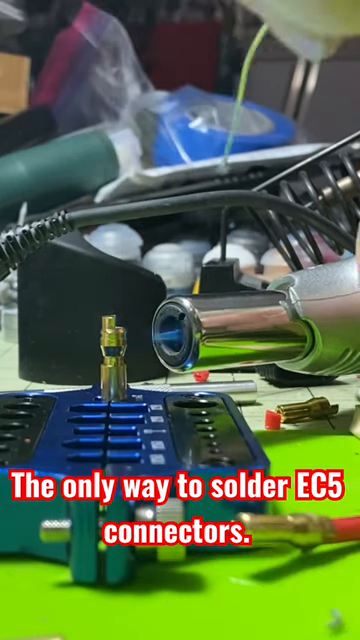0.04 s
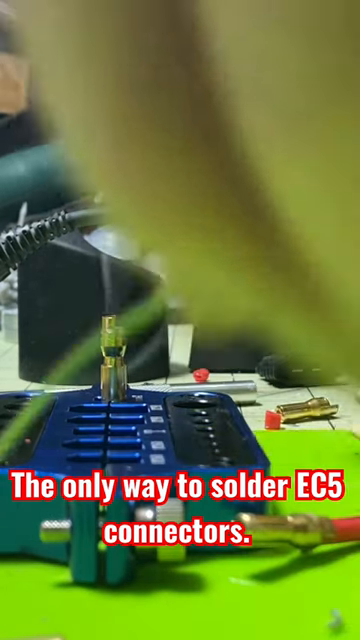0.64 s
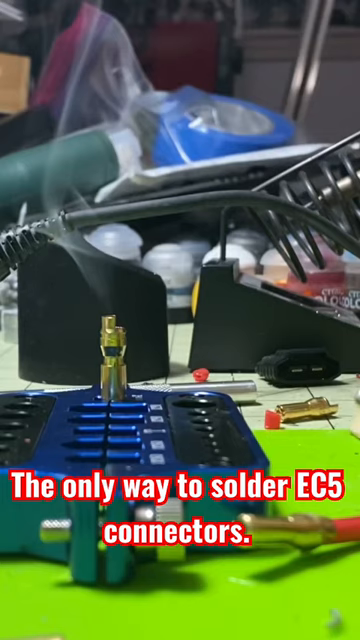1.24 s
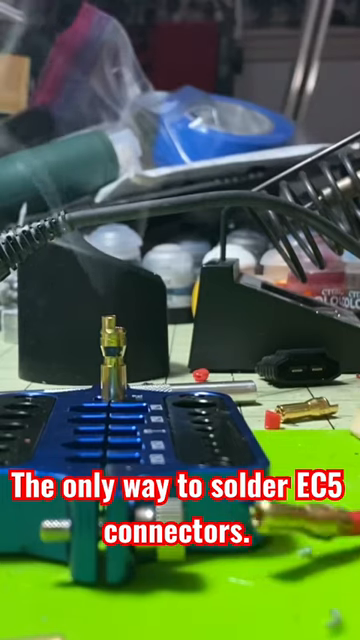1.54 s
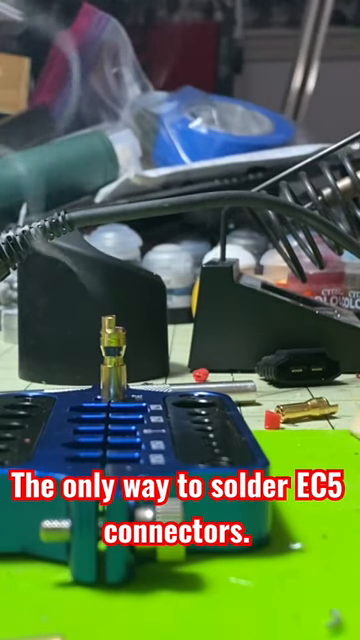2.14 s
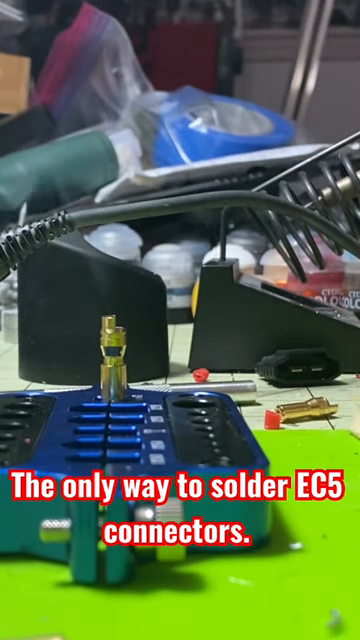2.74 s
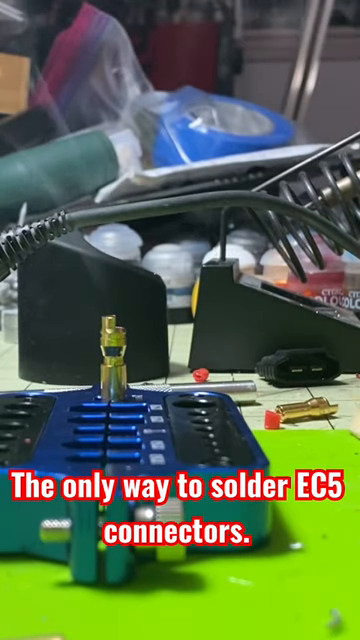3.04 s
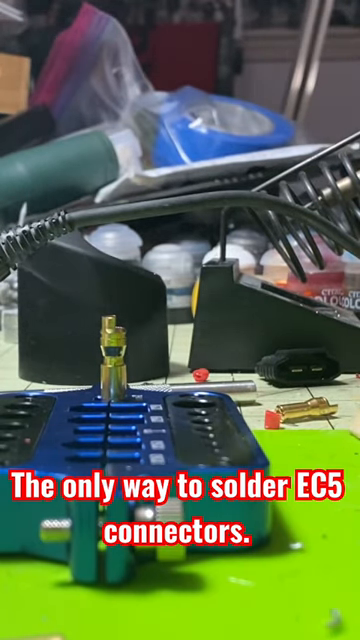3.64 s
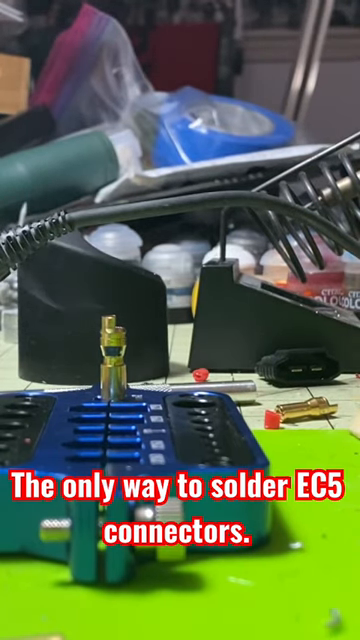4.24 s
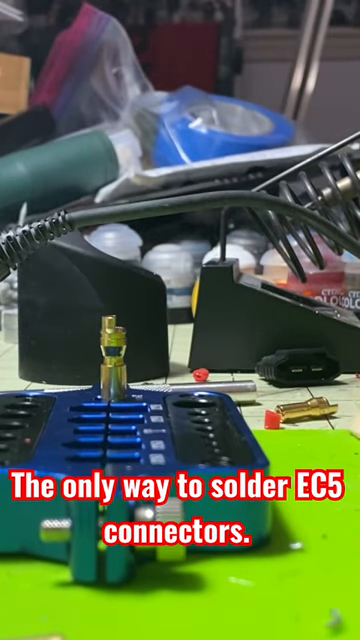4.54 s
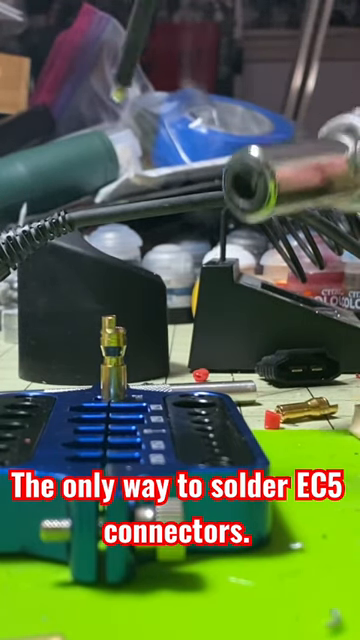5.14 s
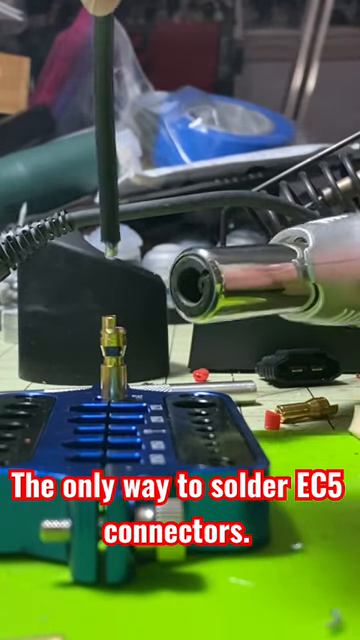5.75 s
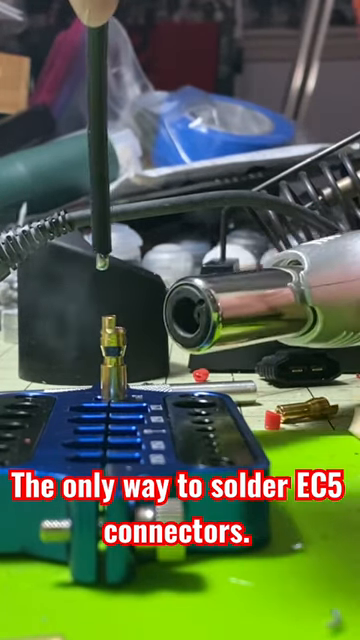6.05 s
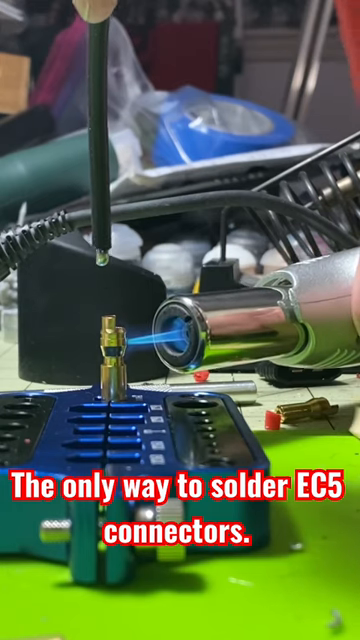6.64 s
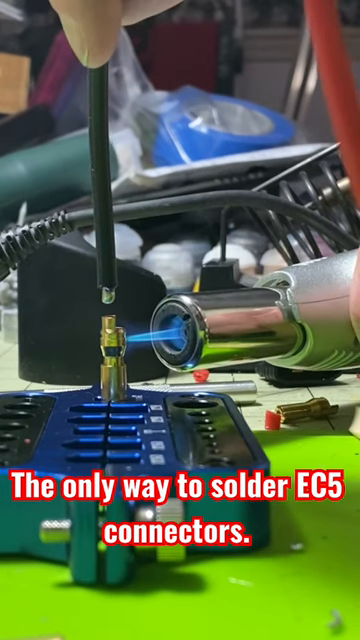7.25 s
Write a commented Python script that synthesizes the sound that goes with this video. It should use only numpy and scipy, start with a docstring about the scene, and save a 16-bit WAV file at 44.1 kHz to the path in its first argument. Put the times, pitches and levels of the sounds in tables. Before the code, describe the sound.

Things are handled on a workbench in a small room, heard from close by: sharp plastic clicks, dull knocks, light rubbing and a brief metal clink. A quiet fan hum comes in as the clicks thin out. Then a gas torch valve opens with a thin hiss. A loud igniter snap and a small puff light the jet flame, which keeps burning with a quiet, even rush.

```python
"""First, hands rub and bump a soldering bench in a small workshop, close to the microphone.
Plastic parts click, a brass connector clinks on its cable, and a small fan hums on the bench.
Near the end, the valve of a butane torch opens and gas hisses thinly through the nozzle.
The piezo igniter snaps, the gas catches with a puff, and the jet flame burns with a steady roar."""
import sys
import numpy as np
from scipy import signal
from scipy.fft import rfft, irfft, next_fast_len
from scipy.io import wavfile

SR = 44100
rng = np.random.default_rng(int(sys.argv[2]) if len(sys.argv) > 2 else 0)


def store_pcm(level_fs):
    """Save levels as 16-bit WAV."""
    pcm = np.round(np.clip(level_fs, -1, 1) * 32767).astype(np.int16)
    wavfile.write(sys.argv[1], SR, np.atleast_2d(pcm).T)


N = 325458

TIME = np.arange(N) / SR
AGE = np.arange(SR // 2) / SR   # seconds since a hit
SIZE = next_fast_len(N + SR // 2)
FREQ = np.maximum(np.arange(SIZE // 2 + 1) * SR / SIZE, 1)
GAS_ON_S, IGNITE_S = 5.835, 6.4575


# the roar of the flame: (frequency [Hz], level [dB])
FLAME_ROAR = [(40, -21), (100, -9.5), (250, 1.5), (700, 0.5), (1200, -2.5), (2200, -12), (3600, -12.5),
              (4600, -9.5), (5600, -17), (9000, -45), (12000, -34)]
# peaks and dips in the flame's roar: (frequency [Hz], width [Hz], gain [dB])
ROAR_PEAKS = [(1449, 120, -20), (1613, 48, 9), (1840, 71, 7), (2130, 100, -5), (2307, 94, 7),
              (2350, 270, 1), (3020, 380, 8), (3590, 60, 10), (4440, 220, -11), (5500, 690, -22)]

def jet_flame():
    """The jet flame makes a broad roar whose low part, below about 800 Hz, flickers."""
    roar = noise(from_db(over_hz(FLAME_ROAR)) * colour(ROAR_PEAKS))
    lows = filtered(roar, keep_below(800))
    flickering = roar - lows + lows * flutter(42, depth_db=1.5)
    return from_db(-48) * ramp(IGNITE_S, length_s=0.018) * flickering


# bands of the gas hiss, cold and with the flame lit; nozzle tones below, thin airy bands on top:
# (frequency [Hz], width [Hz], level [dB])
COLD_HISS = [(4820, 290, 2.5), (5850, 200, -8), (6500, 520, -14.5), (7320, 310, -11), (4020, 1950, -19),
             (10170, 370, -20), (10980, 460, -13), (14400, 460, -18), (15300, 700, -25.5)]
HOT_HISS = [(4940, 350, -1.5), (7500, 640, -4), (10150, 320, -22), (10940, 530, -19.5), (14300, 290, -17.5)]

def gas_hiss():
    """Gas hisses through the nozzle tube; the flame heats the tube, which retunes the hiss."""
    valve, heat = ramp(GAS_ON_S, length_s=0.08), ramp(IGNITE_S, length_s=0.036)
    hiss = np.sqrt(1 - heat) * banded_noise(COLD_HISS) + np.sqrt(heat) * banded_noise(HOT_HISS)
    return from_db(-56.5) * valve * hiss


def banded_noise(bands):
    """A hiss gathered into a few bands."""
    return noise(sum(from_db(db) * np.abs(resonance(hz, width)) ** 2 for hz, width, db in bands))


# the igniter's hammer and its two bounces: (time [s], level [dB])
HAMMER_TAPS = [(6.4588, -0.5), (6.4606, -12), (6.477, -21)]
# ringing tones of the torch body: (pitch [Hz], level [dB], fade time [s])
TORCH_TONES = [(1263.5, -11, 0.022), (1907, -4.5, 0.029), (2640, -13.5, 0.0076), (3667, -9, 0.018),
               (4002, -7, 0.018), (4875, 2.5, 0.018), (6070, -11, 0.011), (6918, 0, 0.0225),
               (12000, -10.5, 0.01), (14300, -13, 0.012), (14910, -3, 0.017)]

def igniter():
    """A sprung hammer hits the crystal, the hand damps the ringing, and the gas catches with a puff."""
    out = struck(HAMMER_TAPS, TORCH_TONES, crack_db=-3, crack_fade_s=0.036)
    puff = thump(hz=109, octaves=1.38, bench_share=0)
    add(out, IGNITE_S, -14.5, puff)
    return out


# plastic clicks; larger parts reach lower and harder contacts reach higher:
# (time [s], level [dB], low edge [Hz], high edge [Hz], fade time [s])
PLASTIC_CLICKS = [(0.338, -49, 1940, 8500, 0.016), (0.52, -46, 1260, 2840, 0.022),
                  (0.702, -32, 1550, 14500, 0.035), (0.713, -30, 1410, 12100, 0.074),
                  (0.818, -43, 2010, 12000, 0.062), (0.8967, -8, 1457, 14800, 0.021),
                  (0.916, -19, 1490, 12900, 0.035), (0.94, -34, 1830, 6000, 0.016),
                  (0.948, -37, 2450, 11800, 0.012), (.987, -36, 2540, 4240, 0.006),
                  (1.043, -20, 1336, 10550, 0.019), (1.331, -56, 5130, 13000, 0.023),
                  (1.444, -57.5, 1748, 4220, 0.014), (1.938, -37, 1600, 3056, 0.019),
                  (2.017, -33.5, 1190, 3280, 0.048), (2.029, -42, 980, 3630, 0.026),
                  (2.078, -39, 1110, 3080, 0.033), (2.105, -53, 700, 1670, 0.018),
                  (2.117, -39, 884, 1950, 0.02), (3.273, -19, 1610, 14200, 0.015),
                  (3.28, -31.5, 1002, 5800, 0.021), (3.337, -43, 1980, 14000, 0.034),
                  (3.487, -40.5, 1680, 13000, 0.027), (3.555, -46.5, 3176, 12080, 0.01),
                  (4.193, -34.5, 1784, 16960, 0.033), (4.228, -37.5, 1750, 5000, 0.0084),
                  (4.311, -43.5, 1800, 17500, 0.06), (4.64, -53.5, 2420, 9860, 0.22),
                  (4.707, -20, 2480, 8890, 0.017), (4.713, -31.5, 3000, 9070, 0.0095),
                  (4.932, -56.5, 1200, 4460, 0.082), (5.144, -40, 1140, 2080, 0.01),
                  (5.637, -50.5, 1670, 10000, 0.027), (5.751, -58.5, 2220, 4260, 0.012),
                  (5.876, -59, 1720, 3070, 0.013), (6.133, -47.5, 1700, 3980, 0.019)]
# peaks and dips of the plastic shell: (frequency [Hz], width [Hz], gain [dB])
PLASTIC_SHELL = [(2460, 300, 3.5), (3900, 210, 1.5), (5600, 700, -2.5), (7160, 500, 2), (9700, 900, 1.5),
                 (10900, 310, 4), (15000, 600, -4.5)]

def plastic_clicks(tone_count=5, ring_db=-20.5, ring_fade_s=0.026):
    """Plastic parts snap together; each snap rings a few tones, and the shell colours them all."""
    out = np.zeros((2, N))
    for s, db, low_hz, high_hz, fade_s in PLASTIC_CLICKS:
        span = high_hz / low_hz
        snap = band(crack(fade_s), np.sqrt(low_hz * high_hz), np.log2(span))
        places = (np.arange(tone_count) + rng.random(tone_count)) / tone_count
        ring = ringing([(hz, ring_db, ring_fade_s) for hz in low_hz * span ** places])
        add(out, s, db, snap / np.abs(snap).max() + ring)
    return filtered(out, colour(PLASTIC_SHELL))


# knocks on the bench: (time [s], level [dB], pitch [Hz], width [octaves], left over right [dB])
BENCH_BUMPS = [(.519, -27.5, 154.3, 1.77, 0), (0.712, -27.5, 225, 2.34, 2.5),
               (0.8967, -8.5, 395, 2.03, 3.5), (.911, -14.5, 140, 2.44, 2),
               (1.023, -28.5, 164.9, 1.85, 0.5), (1.042, -27, 171, 4.1, 5), (1.155, -33, 330.7, 1.02, -1),
               (1.228, -28.5, 84.85, 1.3, -4.5), (1.287, -30.5, 171, 1.34, 3), (1.445, -47, 403, 1.3, 0),
               (1.58, -48, 451, 1.24, 3), (1.785, -41.5, 190, 1.4, 4.5), (1.856, -41, 374, 0.78, -1),
               (2.019, -28, 295.2, 1.9, -3), (2.080, -27.5, 216, 1.8, 0), (2.105, -28.5, 234.5, 1.8, 0),
               (2.127, -19, 85, 1.42, -6.5), (4.2126, -23, 384, 2.14, -11.5), (4.224, -29, 397, 1.8, -8.5),
               (4.314, -42.5, 418, 1.77, -4), (4.455, -51.5, 375, 0.75, 3.5), (4.555, -56.5, 593, 1.26, 0),
               (4.916, -45, 423, 1.97, -2), (5.418, -36.5, 309, 0.65, 2)]

def bench_bumps():
    """Hands and tools knock on the bench; the deepest bumps are mostly a push of air."""
    out = np.zeros((2, N))
    for s, db, hz, octaves, pan_db in BENCH_BUMPS:
        bench_share = 0.38 / (1 + (57 / hz) ** 2)
        sides = from_db([[pan_db / 2], [-pan_db / 2]])
        add(out, s, db, thump(hz, octaves, bench_share) * sides)
    return out


# ringing tones of the bench top: (pitch [Hz], level [dB], fade time [s])
BENCH_TONES = [(62, -10, 0.45), (105.3, 4, 0.17), (200, -4, 0.27), (227.5, -3.5, 0.27), (359, -7.5, 0.023),
               (473, -3, 0.08), (596, -3, 0.15), (743.4, -10, 0.013)]

def thump(hz, octaves, bench_share, settle_s=0.016):
    """A soft push of air; what is set down rocks twice, the bench rings and things on it shudder."""
    first, second = (signal.unit_impulse(len(AGE), int(SR * s)) for s in settle_s * rng.random(2))
    ring = 0.01 * ringing(BENCH_TONES)
    shudder = 0.098 * crack(fade_s=0.08)
    push = signal.unit_impulse(len(AGE))
    return band(push + bench_share * (first - second + ring + shudder), hz, octaves)


# taps of the connector: (time [s], level [dB])
CONNECTOR_TAPS = [(1.7356, -23.5), (1.810, -46)]
# its ringing tones: (pitch [Hz], level [dB], fade time [s])
CONNECTOR_TONES = [(2600, -8, 0.045), (3299, -6.5, 0.013), (4280, -3, 0.034), (4830, -6, 0.061),
                   (5320, -8, 0.027), (7140, -9, 0.024), (11410, -14, 0.023)]

def brass_connector():
    """The connector on its cable taps the vice and clinks."""
    return struck(CONNECTOR_TAPS, CONNECTOR_TONES, crack_db=1, crack_fade_s=0.012, hz=6550, octaves=2)


# nudges of the connector: (time [s], level [dB])
NUDGE_TAPS = [(.898, -33), (2.018, -38.5), (2.081, -42), (2.129, -30.5)]
# the tones they ring: (pitch [Hz], level [dB], fade time [s])
NUDGE_TONES = [(2290, -9, .15), (3597, 1.5, 0.09), (4990, -5, .06), (7105, -13, .04), (9220, -1, 0.038),
               (11650, -3, .025), (15510, -20, .03)]

def connector_nudges():
    """The connector on its cable is nudged and rings briefly, with a second kind of metal clink."""
    return struck(NUDGE_TAPS, NUDGE_TONES, crack_db=-7.5, crack_fade_s=0.0089)


# nudges of the stand: (time [s], level [dB])
WIRE_TAPS = [(.9, -44.5), (4.224, -45)]
# its ringing tones: (pitch [Hz], level [dB], fade time [s])
WIRE_TONES = [(610, 1.5, 0.7), (1760, -14.5, 0.35), (2600, -8, 0.33), (2934, -11.5, 0.35)]

def wire_stand():
    """The wire stand of the soldering iron is nudged and rings on softly."""
    return struck(WIRE_TAPS, WIRE_TONES, crack_db=-7, crack_fade_s=0.29)


# fingers and cable sliding over the bench:
# (middle time [s], length [s], dull drag [dB], bright rustle [dB], rustle pitch [Hz])
BENCH_RUBS = [(0.02, 0.22, -70.5, -56.5, 1620), (0.167, 0.36, -76.5, -76, 3200),
              (0.376, 0.11, -80, -70.5, 3160), (0.491, 0.058, -70.5, -66.5, 3570),
              (0.59, 0.19, -55, -71.5, 3020), (0.825, 0.36, -68, -69, 3020), (0.906, 0.079, -52, -52, 3300),
              (1.13, 0.11, -53, -59, 2600), (1.385, 0.42, -63.5, -69.5, 2720),
              (1.704, 0.37, -58, -83, 2620), (1.904, 0.16, -53.5, -61.5, 2056),
              (2.055, 0.16, -49.5, -68, 1900), (2.66, 0.36, -86, -81.5, 3930),
              (2.958, 0.18, -80.5, -79, 2313), (4.347, 0.19, -60, -76.5, 1500),
              (4.551, 0.42, -67, -83, 978), (5.007, 0.082, -78, -71, 1900), (5.678, 0.06, -63, -71, 1958),
              (6.316, 0.54, -75, -79, 1752)]

def rubbing(tremble_hz=88):
    """Each rub swells and fades, sticking and slipping; bumps and dragging make the bench tremble."""
    friction, slips = noise(1) * flutter(90, depth_db=3), slipping()
    drag, rustle, tremble = np.zeros(N), np.zeros((2, N)), np.zeros((1, N))
    for s, length, drag_db, rustle_db, rustle_hz in BENCH_RUBS:
        now = np.abs(TIME - s) < length / 2
        swell = np.cos(np.pi * (TIME[now] - s) / length)
        drag[now] += from_db(drag_db) * swell
        bright = rms_one(band(slips[:, now], rustle_hz, octaves=1.1))
        rustle[:, now] += from_db(rustle_db) * swell * bright
    shake = (1 - dying(0.02)) * dying(0.4)   # builds fast, fades slowly
    for s, db, hz, _, _ in BENCH_BUMPS:
        add(tremble, s, db - 17 - 20 * np.log10(hz / tremble_hz), shake)   # deeper bumps shake more
    scrape = drag * flutter(7.6, depth_db=1.5) * rms_one(band(friction, hz=434, octaves=0.95))
    rumble = rms_one(band(friction.mean(axis=0), tremble_hz, octaves=1.8))
    return rustle + scrape + (tremble + from_db(4) * drag) * rumble


# peaks and dips of the rubbed parts: (frequency [Hz], width [Hz], gain [dB])
RUBBED_PARTS = [(2760, 300, 3.5), (3180, 600, -7.5), (4320, 590, 3.5), (6300, 840, 0)]

def slipping(slips_per_s=520, spread_db=3):
    """Tiny slips crackle over an even hiss, and both surge with the pressure of the rub."""
    sizes = from_db(spread_db * np.minimum(rng.exponential(1, N), 4)) * rng.choice([-1, 1], N)
    slips = sizes * (rng.random(N) < slips_per_s / SR)
    return filtered(rms_one(slips) + noise(1), colour(RUBBED_PARTS)) * flutter(6.7, depth_db=4.5)


def grip_squeak(middle_s=6.035, length_s=0.065, hz=1800):
    """A faint squeak as the torch is gripped: one tone that swells and fades."""
    swell = np.cos(np.pi * np.clip((TIME - middle_s) / length_s, -.5, .5))
    return from_db(-67.5) * swell * np.sin(2 * np.pi * hz * TIME)


# how loud the fan is: (time [s], level [dB])
FAN_LEVEL = [(0, -77.5), (1.7, -65), (2.0, -54), (4.32, -53), (4.53, -79), (4.74, -51.5), (4.93, -62),
             (7.38, -60)]
# its rush of air: (frequency [Hz], level [dB])
FAN_RUSH = [(400, -8), (800, -11), (1150, -5), (1600, -21.5), (4000, -24.5)]

def bench_fan(hum_hz=218.2, sag_hz=6.8, sag_at_s=4.6, sag_spread_s=0.22):
    """A small fan hums over a faint rush of air; its pitch is steady but for one brief sag."""
    level = from_db(in_time(FAN_LEVEL))
    hz = hum_hz - sag_hz * np.exp(-((TIME - sag_at_s) / sag_spread_s) ** 2)
    phase = 2 * np.pi * np.cumsum(hz) / SR
    octave = from_db(-21) * level / level.max() * np.sin(2 * phase)   # grows with the hum
    hum = np.sqrt(2) * (np.sin(phase) + octave)
    air = from_db(-28) * noise(from_db(over_hz(FAN_RUSH)) * (FREQ < 5000))
    return level * (hum + air)


# how much of the hits feeds the echo; close work is drier: (time [s], level [dB])
ECHO_AMOUNT = [(.7, -1.5), (.9, -6.5), (1.05, -1.5), (1.75, -3), (2.1, -1), (3.3, 0.5), (4.7, -0.5),
               (6.45, -7.5)]
# the tone of the echo: (frequency [Hz], level [dB])
ECHO_TONE = [(60, -14.5), (400, -5.5), (1500, -3.5), (2600, -4), (5000, -6), (8000, -16), (16000, -21.5)]

def workshop_echo(hits, fade_s=0.14, treble_fade_s=0.32):
    """A small cluttered room blurs the hits into echoes, different on each side and longer in treble."""
    sent = hits.mean(axis=0) * from_db(in_time(ECHO_AMOUNT))
    echoes = rng.standard_normal((2, len(AGE))) * (1 - dying(0.023))
    tail, treble_tail = echoes * dying(fade_s), echoes * dying(treble_fade_s)
    low = keep_below(6500)
    response = low * rfft(tail, SIZE) + (1 - low) * rfft(treble_tail, SIZE)
    return filtered(sent, response * from_db(over_hz(ECHO_TONE)) / np.linalg.norm(tail[0]))


# the quiet of the workshop: (frequency [Hz], level [dB])
QUIET_ROOM = [(25, -20), (50, 0), (90, 2), (160, -2), (300, -7), (600, -24), (1200, -24), (2000, -32.5),
              (4500, -35), (8000, -40.5), (11500, -34.5), (13200, -44), (15500, -35)]

def workshop_quiet():
    """A faint, steady rumble lies under everything."""
    return from_db(-65.5) * noise(from_db(over_hz(QUIET_ROOM)))


# how alike left and right are: (frequency [Hz], likeness [0 to 1])
STEREO_LIKENESS = [(60, 0.78), (290, 0.77), (640, 0.094), (1400, 0.035), (3100, 0.56), (7000, 0.081),
                   (15000, 0.73)]

def noise(gain):
    """Stereo noise shaped by a gain at each frequency, partly alike on both sides; rms 1."""
    mid, side = rng.standard_normal((2, N))
    alike = np.clip(over_hz(STEREO_LIKENESS), 0, 1)
    shared = filtered(mid, gain * np.sqrt(1 + alike))
    opposed = filtered(side, gain * np.sqrt(1 - alike)) * [[1], [-1]]
    return rms_one(shared + opposed)


def struck(taps, tones, crack_db, crack_fade_s, hz=5000, octaves=4.6):
    """Each tap on metal gives a crack around hz and a ring; softer taps stir the high tones less."""
    out, hardest = np.zeros((2, N)), max(db for _, db in taps)
    for s, db in taps:
        db_per_octave = 0.35 * (db - hardest)
        stirred = [(pitch, level + db_per_octave * np.log2(pitch / tones[0][0]), fade_s)
                   for pitch, level, fade_s in tones]
        add(out, s, db, ringing(stirred) + from_db(crack_db) * band(crack(crack_fade_s), hz, octaves))
    return out


def ringing(tones, detune=0.0041):
    """Fading tones, each beating with a weaker twin; strengths vary by blow and by side."""
    strengths = from_db(1.5 * rng.standard_normal((len(tones), 2, 1)))
    twins = 1 + detune * rng.standard_normal(len(tones))
    out = np.zeros((2, len(AGE)))
    for k, (hz, db, fade_s) in enumerate(tones):
        phase = 2 * np.pi * hz * AGE
        pair = (np.sin(phase) + .5 * np.sin(twins[k] * phase)) / 1.5
        out += (-1) ** k * strengths[k] * from_db(db) * pair * dying(fade_s)
    return out


def crack(fade_s):
    """The noisy, fading vibration of a hard contact, a little different on each side."""
    mid, side = rng.standard_normal((2, len(AGE)))
    return (mid + .35 * side * [[1], [-1]]) * dying(fade_s) * (1 - dying(.005))


def add(out, s, db, sound):
    """Mix a sound in at a time and a peak level."""
    at = round(s * SR)
    out[:, at:at + len(AGE)] += (from_db(db) * sound / np.abs(sound).max())[..., :N - at]


def dying(fade_s):
    """A level that falls 60 dB in the fade time."""
    return from_db(-60 * AGE / fade_s)


def ramp(start_s, length_s):
    """A straight rise from 0 to 1."""
    return np.clip((TIME - start_s) / length_s, 0, 1)


def flutter(rate_hz, depth_db):
    """A randomly wavering gain."""
    return from_db(depth_db * rms_one(filtered(rng.standard_normal(N), keep_below(rate_hz))))


def from_db(db):
    """Decibels to gain."""
    return 10 ** (np.asarray(db) / 20)


def rms_one(x):
    """Scale to unit rms."""
    return x / np.sqrt(np.mean(x ** 2) + 1e-20)


def in_time(points):
    """Join (time [s], value) points with straight lines."""
    return np.interp(TIME, *np.transpose(points))


def over_hz(points):
    """Join (frequency [Hz], value) points, with octaves evenly spaced."""
    hz, value = np.transpose(points)
    return np.interp(np.log(FREQ), np.log(hz), value)


def filtered(x, response):
    """Pass a sound through a filter curve."""
    return irfft(rfft(x, SIZE) * response, SIZE)[..., :N]


def band(x, hz, octaves):
    """Keep a band of frequencies around hz."""
    half = 2 ** (octaves / 2)
    edges = [hz / half, min(hz * half, .45 * SR)]
    return signal.sosfilt(signal.butter(2, edges, "band", fs=SR, output="sos"), x)


def keep_below(hz):
    """A filter curve that keeps what lies below hz."""
    return 1 / (1 + (FREQ / hz) ** 4)


def resonance(hz, width):
    """A filter curve with one peak of height 1."""
    return 1 / (1 + 1j * (FREQ ** 2 - hz ** 2) / (FREQ * width))


def colour(peaks):
    """A filter curve of peaks and dips: (frequency [Hz], width [Hz], gain [dB])."""
    return np.prod([1 + (from_db(db) - 1) * resonance(hz, width) for hz, width, db in peaks], axis=0)


# how much louder the bench is on the left: (frequency [Hz], left over right [dB])
SIDE_BALANCE = [(60, 3), (380, 1), (700, 3), (1290, 2), (2400, 5), (4400, 6.5), (8100, 1.5), (15000, 0.5)]

def scene():
    """Sounds from the bench arrive a little earlier and louder on the left; the room surrounds them."""
    metal = brass_connector() + connector_nudges() + wire_stand()
    hits = metal + plastic_clicks() + bench_bumps() + igniter()
    # the deepest bass is cut from the hits
    hits = signal.sosfilt(signal.butter(2, 48, "high", fs=SR, output="sos"), hits)
    near = hits + rubbing() + grip_squeak() + gas_hiss() + jet_flame() + bench_fan()
    balance = from_db(over_hz(SIDE_BALANCE) * [[.5], [-.5]])
    lag = np.exp(-2j * np.pi * FREQ / SR * [[0], [1]])   # the right side is one sample late
    return filtered(near, balance * lag) + workshop_echo(hits) + workshop_quiet()


# two dips and a peak in the treble of the whole sound: (frequency [Hz], width [Hz], gain [dB])
TREBLE_SHAPE = [(8510, 2000, -12), (13200, 940, -11), (14400, 1000, 6.5)]

def record(dry, bass_delay_s=0.025, corner_hz=130, cutoff_hz=16100):
    """The microphone passes bass late, so thumps sweep down; peaks are rounded and the top is cut."""
    phase = 4 * np.pi * bass_delay_s * corner_hz * (1 - 1 / np.sqrt(1 + FREQ / corner_hz))
    picked_up = filtered(dry, colour(TREBLE_SHAPE) * np.exp(-1j * phase))
    rounded = .9 * np.tanh(picked_up / .9)
    return filtered(rounded, 1 / np.sqrt(1 + (FREQ / cutoff_hz) ** 160))


dry = scene()
out = record(dry)
store_pcm(out)
```